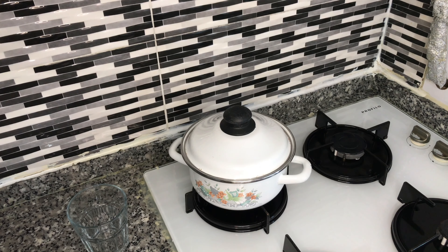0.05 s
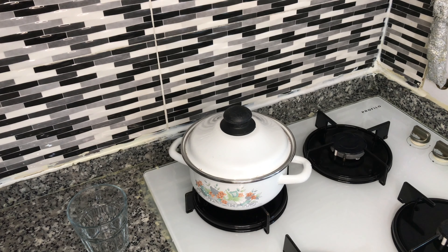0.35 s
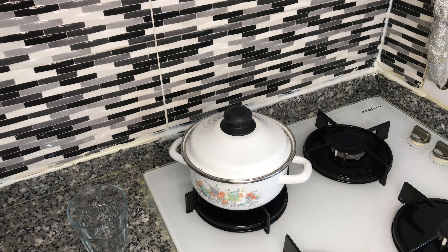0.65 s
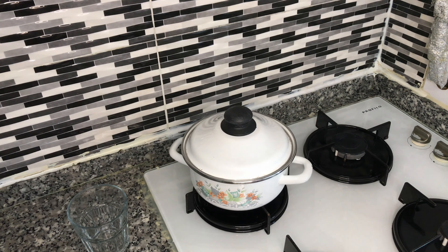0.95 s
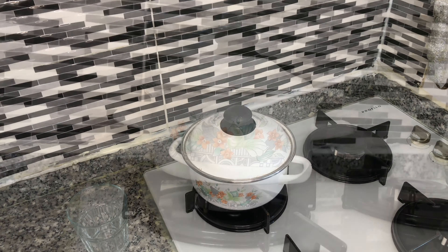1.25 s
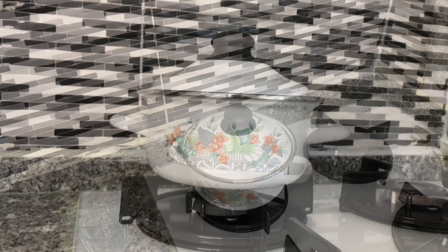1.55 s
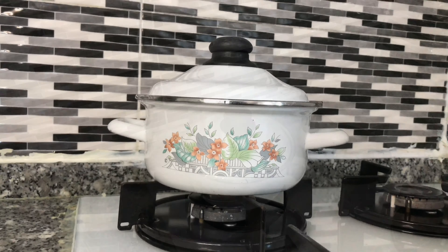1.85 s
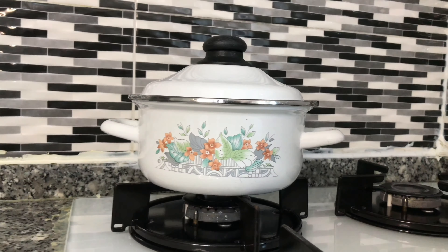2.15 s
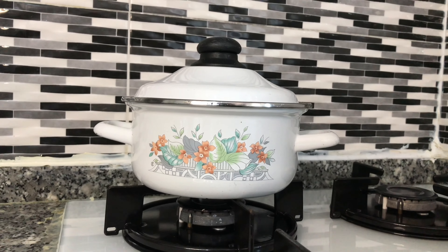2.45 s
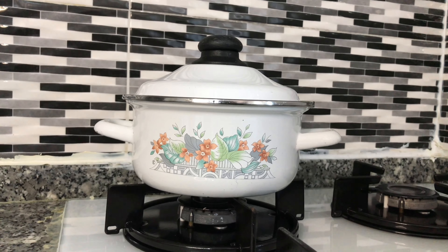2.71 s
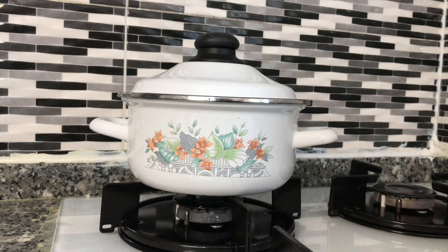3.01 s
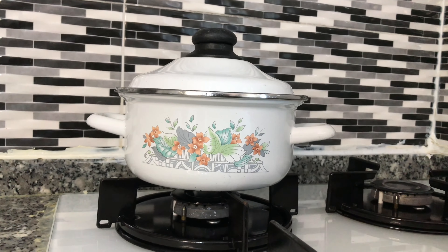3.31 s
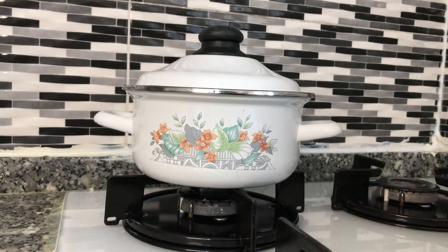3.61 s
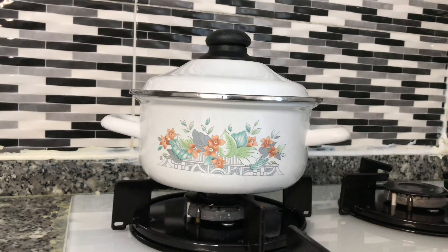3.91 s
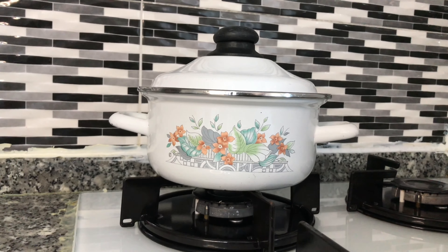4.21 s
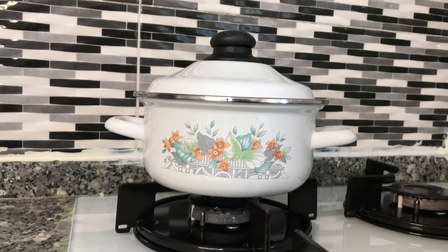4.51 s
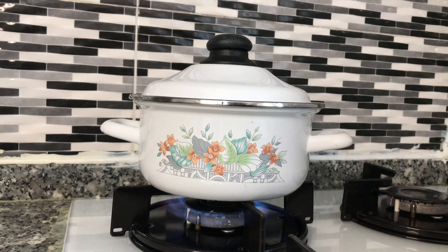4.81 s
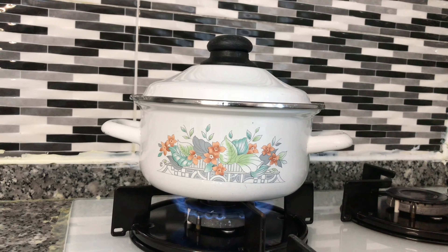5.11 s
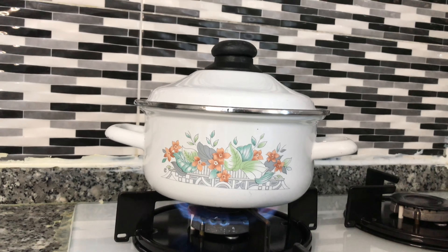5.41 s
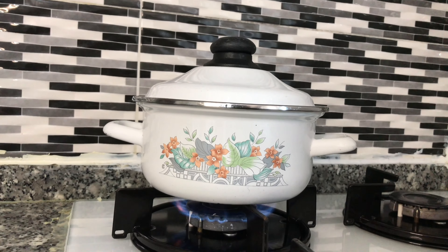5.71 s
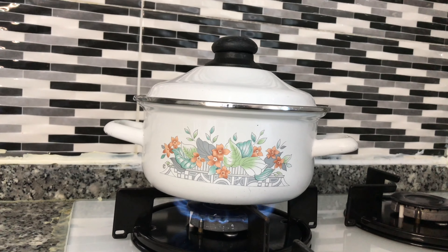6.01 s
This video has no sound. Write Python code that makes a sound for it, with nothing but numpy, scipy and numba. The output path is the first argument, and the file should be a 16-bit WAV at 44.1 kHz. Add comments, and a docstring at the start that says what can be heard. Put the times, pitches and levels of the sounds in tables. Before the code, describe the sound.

Quiet room air and a low rumble fill a small tiled kitchen, with a faint sleeve rustle and a few light handling taps in the first second and a half. At about 1.7 seconds a hard object is set down with one clattering knock that rings briefly. After a quiet pause, a stove knob clicks faintly at 4 seconds and gas begins a soft, steady hiss with an airy whistle in it. From 4.4 seconds the igniter snaps six times, about three a second, sharp, close and much louder than the rest, each snap with a short echo. The second spark, at 4.7 seconds, lights the burner with a low, fluttering puff, and the hiss lifts slightly in pitch. The last snap comes at 6 seconds, and the burner keeps hissing to the end at about 6.4 seconds.

```python
"""Small tiled kitchen: a gas burner is lit under an enamel pot.
Over room air and faint handling, a hard object is set down with one ringing knock.
The knob clicks, the valve opens, and the gas jet hisses and sounds the burner's mixing tube.
The igniter snaps six times, echoing off pot and hob. The second spark lights the gas with a soft,
fluttering puff; heat raises the tube's pitches."""
import sys
import numpy as np
from scipy import signal
from scipy.fft import rfft, irfft, next_fast_len
from scipy.io import wavfile
from numba import njit

SR = 44100
rng = np.random.default_rng(int(sys.argv[2]) if len(sys.argv) > 2 else 0)


def to_wav(sig):
    """Store sig (one row per channel, or 1-D mono) as 16-bit WAV at the path in sys.argv[1].

    Samples outside -1..1 are clipped; the rate is SR.
    """
    pcm = np.clip(np.atleast_2d(sig), -1, 1) * 32767
    pcm = np.round(pcm).astype(np.int16)
    wavfile.write(sys.argv[1], SR, pcm.T)  # frames by channels


N = 275791
BURST_SIZE = 32768
TIME = np.arange(N) / SR
AGE = TIME[:BURST_SIZE]   # s since a burst's onset
KNOB_S, LIGHT_S, FLARE_S = 3.977, 4.725, 0.24   # knob clicks, gas catches, length of the flare
CUTOFF_HZ = 16100


def from_db(db):
    """Decibels to gain."""
    return 10 ** (np.asarray(db) / 20)


def rms_one(x):
    """Scale to rms 1."""
    return x / np.sqrt(np.mean(x ** 2) + 1e-20)


def energy_one(x):
    """Scale to unit energy."""
    return x / np.sqrt(np.sum(x ** 2) + 1e-20)


def coloured(x, colour):
    """Minimum-phase filter; colour rows (f/Hz, level/dB) are joined on a log-frequency axis."""
    size = next_fast_len(2 * len(x)) // 2 * 2
    hz, db = np.array(colour).T
    bin_hz = np.maximum(np.fft.rfftfreq(size, 1 / SR), 1)
    bin_db = np.interp(np.log(bin_hz), np.log(hz), db)
    cepstrum = irfft(np.log(from_db(bin_db)))
    cepstrum[1:size // 2] *= 2
    cepstrum[size // 2 + 1:] = 0
    return irfft(rfft(x, size) * np.exp(rfft(cepstrum)))[:len(x)]


def noise(colour, size=N):
    """Coloured noise, rms 1."""
    return rms_one(coloured(rng.standard_normal(size), colour))


def fade(t60_s):
    """Exponential decay from 1."""
    return np.exp(-np.log(1000) * AGE / t60_s)


def approach(start_s, rise_s):
    """0 until the start, then an exponential approach to 1."""
    return 1 - np.exp(-np.maximum(TIME - start_s, 0) / rise_s)


def stroke(peak_s, rise_s, fall_s):
    """Exponential swell to 1 and decay."""
    return np.exp(-np.maximum((peak_s - TIME) / rise_s, (TIME - peak_s) / fall_s))


def drift(rate_hz):
    """Random wander between knots of spread 1."""
    knots = rng.standard_normal(2000)
    return np.interp(TIME * rate_hz, np.arange(len(knots)), knots)


def add(track, start_s, sound):
    """Mix a sound into a track."""
    at = round(start_s * SR)
    track[at:at + len(sound)] += sound[:len(track) - at]


@njit
def resonate(x, angle, radius):
    """Two-pole resonance with moving centre and width, peak gain 1."""
    y = np.zeros(len(x))
    for i in range(2, len(x)):
        r = radius[i]
        drive = (1 - r * r) / 2 * (x[i] - x[i - 2])
        y[i] = drive + 2 * r * np.cos(angle[i]) * y[i - 1] - r * r * y[i - 2]
    return y


def whistle(hz, width_hz):
    """Noise twice through one resonance: an airy pitch of constant power."""
    hz, width_hz = hz + np.zeros(N), width_hz + np.zeros(N)
    angle = 2 * np.pi * hz / SR
    radius = np.exp(-np.pi * width_hz / SR)
    once = resonate(rng.standard_normal(N), angle, radius)
    return resonate(once, angle, radius) * np.sqrt(width_hz[0] / width_hz)


def struck(modes, spread_db):
    """Decaying sines with scattered levels and random phases."""
    out = 0
    for hz, db, t60_s in modes:
        gain = from_db(db - spread_db * rng.standard_normal())
        out += gain * fade(t60_s) * np.sin(2 * np.pi * (hz * AGE + rng.random()))
    return out


def background(air_db=-64.5, room_db=-62.5, grip_db=-55, grip_decay_s=0.48, flame_db=-57,
               hum_db=-66, hum_hz=48.9):
    """Room air, faint mains hum and the low rumble of room, hand and flame."""
    rumble_colour = [(12, -29.5), (20, -19), (32, -5), (49, 1.5), (80, -7.5), (108, -12), (124, -20.5),
                     (160, -13.5), (210, -48), (350, -120)]   # rumble spectrum: f/Hz, level/dB
    air_colour = [(65, -25), (110, 0.5), (125, -8.5), (150, -7), (253, -5), (503, -14.5), (688, -11.5),
                  (981, -15), (1340, -15), (1460, -16.5), (1720, -17.5), (10500, -29.5), (13300, -29.5),
                  (16000, -33)]   # room air spectrum: f/Hz, level/dB
    grip = from_db(grip_db) * np.exp(-TIME / grip_decay_s)
    flame = from_db(flame_db) * approach(LIGHT_S, FLARE_S)
    rumble = np.sqrt(from_db(room_db) ** 2 + grip ** 2 + flame ** 2) * noise(rumble_colour)
    phase = 2 * np.pi * hum_hz * TIME
    hum = from_db(hum_db + drift(rate_hz=4.6)) * (np.sin(phase) + 0.5 * np.sin(2 * phase))
    return rumble + hum + from_db(air_db) * noise(air_colour)


def faint_whistle(hz=1770, width_hz=110, level_db=-77, end_s=2.07):
    """A faint thin whistle sounds at first and dies away."""
    fade_out = np.clip(2 * (end_s - TIME), 0, 1)
    return from_db(level_db) * rms_one(whistle(hz, width_hz)) * fade_out


def handling(sleeve_db=-58, push_db=-57):
    """A sleeve brushes past; later the hob's body rumbles as the hand pushes the knob home."""
    sleeve_colour = [(250, -6), (650, 1), (1800, -1), (3600, -0.5), (7500, -10), (14000, -15), (16000, -17)]   # cloth rustle: f/Hz, level/dB
    push_colour = [(60, -14), (150, 0), (300, 2.5), (600, -11), (1100, -10), (2500, -46)]   # hob body: f/Hz, level/dB
    sleeve = stroke(peak_s=0.47, rise_s=0.14, fall_s=0.1) * noise(sleeve_colour)
    push = stroke(peak_s=KNOB_S, rise_s=0.14, fall_s=0.07) * noise(push_colour)
    return from_db(sleeve_db) * sleeve + from_db(push_db) * push


def ticks(edge_ratio=1.44):
    """Faint taps, bumps and the gas knob's click: decaying bands of noise."""
    taps = [(0.701, -52, 212, 0.069), (.741, -47.5, 195, 0.071), (0.754, -44, 79.5, 0.083),
            (0.930, -57, 8500, .02), (1.131, -57.5, 2800, 0.023), (1.478, -48.5, 9500, 0.01),
            (1.64, -36, 74, 0.15)]   # handling taps: t/s, level/dB, f/Hz, t60/s
    knob_click = [(-58.5, 730, .24), (-53.5, 2240, 0.16), (-58, 8300, .05)]   # bands of the click: level/dB, f/Hz, t60/s
    out = np.zeros(N)
    for start_s, db, hz, t60_s in list(taps) + [(KNOB_S, *part) for part in knob_click]:
        edges_hz = np.clip([hz / edge_ratio, hz * edge_ratio], 20, CUTOFF_HZ)
        bandpass = signal.butter(2, edges_hz, "band", fs=SR, output="sos")
        band = signal.sosfilt(bandpass, rng.standard_normal(BURST_SIZE))
        add(out, start_s, from_db(db) * rms_one(band) * fade(t60_s))
    return out


def knock(clack_db=-23, clack_t60_s=0.081, ring_db=-33, tail_db=-36):
    """A hard object touches, lands and rocks; the hardest blow sets its modes ringing."""
    contacts = [(1.6458, -12, 1500), (1.6635, 2, 9000), (1.6707, 1, 2930), (1.6945, -4, 1100)]   # blows: t/s, level/dB, low-pass f/Hz
    modes = [(188, -9, .4), (282, -6, .28), (307, -7, .3), (404, -11, .27), (545, -11, .52), (655, -4, .48),
             (709, -7, .3), (780, -6, .26), (908, 1, .22), (977, -3, .2), (1045, -3, .2), (1100, -1, .22),
             (1339, 2, .29), (1370, -2, .29), (1561, -11, .4), (1686, -3, .39), (1848, -9, .33),
             (2132, -10, .33), (2350, -6, .26), (2783, -13, .23), (3192, -9, .13), (3700, -17, .19),
             (5523, -25, .54)]   # object's modes: f/Hz, level/dB, t60/s
    colour = [(24, -48), (40, -11), (133, -26), (290, -11.5), (412, -18), (646, -10), (1240, -13),
              (1370, -3.5), (1480, -12), (2320, -15), (2910, -18), (3740, -23), (7540, -36), (12500, -31),
              (16000, -31)]   # clack spectrum: f/Hz, level/dB
    out = np.zeros(N)
    for start_s, db, lowpass_hz in contacts:
        clack = from_db(clack_db) * noise(colour, BURST_SIZE) * fade(clack_t60_s)
        tail = from_db(tail_db) * kitchen_tail(colour, build_s=0.0019)
        softness = signal.butter(1, lowpass_hz, fs=SR)
        add(out, start_s, from_db(db) * signal.lfilter(*softness, clack + tail))
    landing_s = max(contacts, key=lambda row: row[1])[0]
    add(out, landing_s, from_db(ring_db) * struck(modes, spread_db=1.0))
    return out


def kitchen_tail(colour, build_s):
    """Diffuse sound builds up between the tiles and dies band by band."""
    decays = [(100, 0.76), (600, 0.47), (1700, 0.36), (4000, 0.3), (8000, 0.25), (15000, 0.23)]   # reverberation: f/Hz, t60/s
    spectrum = rfft(noise(colour, BURST_SIZE))
    bin_hz = np.fft.rfftfreq(BURST_SIZE, 1 / SR)
    centres_hz = [hz for hz, _ in decays]
    out = 0
    for weights, (_, t60_s) in zip(np.eye(len(decays)), decays):
        band = irfft(spectrum * np.interp(bin_hz, centres_hz, weights))
        out += band * fade(t60_s)
    return out * (1 - np.exp(-AGE / build_s))


def gas(open_s=4.015, level_db=-47, tube_db=-0.73, jet_db=-7.0, hot_width_share=0.73):
    """Jet turbulence sounds the mixing tube, whose pitches rise and sharpen with heat."""
    # mixing tube: cold f/Hz, width/Hz, level/dB, rise at full heat/Hz, gain at full heat/dB
    modes = [(1820, 220, 0, 50, -1), (2130, 320, -19, 250, 12), (4050, 600, -8.5, 560, 5.5),
             (6330, 350, -1, 190, -1), (8450, 450, -17, 300, 0), (9150, 900, -16, 300, 1),
             (10700, 400, -22, 350, 3), (12520, 300, -12, 300, -1), (14220, 280, -12, 330, 4),
             (14750, 400, -19, 300, 10)]
    jet_colour = [(200, -8), (550, -10.5), (1150, 5), (1600, 7.5), (2400, -1), (2900, -2.5), (3500, -4),
                  (5000, -5.5), (5800, 4.5), (6900, -7), (7700, -1), (10300, -16), (13500, -0.5),
                  (15600, -9.5)]   # broad hiss: f/Hz, level/dB
    heat = burner_heat()
    narrowing = hot_width_share ** np.clip(2 * heat, 0, 1)
    tube = 0
    for hz, width_hz, db, rise_hz, hot_db in modes:
        flutter_db = 1.5 * drift(rate_hz=70)
        tone = whistle(hz + rise_hz * heat, width_hz * narrowing)
        tube += tone * from_db(db + hot_db * heat + flutter_db)
    flow = approach(open_s, rise_s=0.096)
    tube = from_db(tube_db) * rms_one(tube) * flow
    jet = from_db(jet_db) * noise(jet_colour) * flow ** 1.5   # needs nearly full flow
    waver_db = 0.5 * drift(rate_hz=4)
    return (tube + jet) * from_db(level_db + waver_db)


def igniter(crack_db=5.0, scatter_db=9.0, scatter_t60_s=0.06, scatter_hz=1400, ring_db=-29, tail_db=-26):
    """Each spark is one sharp pulse; it takes the same paths round pot and hob, then fills the room."""
    sparks = [(4.4074, -2.5), (4.7255, -1.5), (5.0282, -1.5), (5.346, -1), (5.6651, -1.16), (5.968, -1)]   # discharges: t/s, level/dB
    pulse_colour = [(40, -15), (90, 4), (300, -4.5), (550, -13.5), (900, -18), (1250, -9), (2200, -13),
                    (2750, -15.5), (3100, -4.5), (4900, -5), (6300, -1.5), (12700, 2.5), (15500, 2),
                    (17000, -26.5)]   # spark spectrum: f/Hz, level/dB
    reflections = [(.00055, .4), (.00098, .45), (.0021, .27), (.0042, .42)]   # off pot base and hob: delay/s, gain
    gap_modes = [(3343, -5, .05), (4700, -7, .04), (6120, -3, .035), (6900, -5, .03), (8084, -2, .04),
                 (8325, -2, .04), (8945, -3, .04), (9520, 0, .04), (11507, 0, .035), (12036, -1, .035),
                 (12730, 2, .035), (13876, -1, .035)]   # burner-to-pot gap: f/Hz, level/dB, t60/s
    tail_colour = [(200, -19.5), (900, -19), (1800, -5), (2700, -7.5), (3200, -3), (5000, -5), (7500, 0.5),
                   (9500, 4), (12500, 4.5), (16000, -10.5)]   # reverberation: f/Hz, level/dB
    echoes = from_db(scatter_db) * energy_one(rng.standard_normal(BURST_SIZE) * fade(scatter_t60_s))
    for delay_s, gain in reflections:
        echoes[round(delay_s * SR)] += gain * from_db(crack_db)
    # only short waves bounce off the pot and its supports
    echoes = signal.lfilter(*signal.butter(2, scatter_hz, "high", fs=SR), echoes)
    impulse = signal.unit_impulse(BURST_SIZE)
    paths = from_db(crack_db) * impulse + echoes
    pulse = energy_one(coloured(impulse, pulse_colour))
    ring = from_db(ring_db) * struck(gap_modes, spread_db=1.5)
    snap = signal.fftconvolve(pulse, paths)[:BURST_SIZE] + ring
    out = np.zeros(N)
    for start_s, db in sparks:
        tail = from_db(tail_db) * kitchen_tail(tail_colour, build_s=0.0056)
        add(out, start_s, from_db(db) * (snap + tail))
    return out


def burner_heat(steady_heat=0.34, settle_s=0.16):
    """Heat climbs to 1 during the flare, then relaxes to that of the steady flame."""
    flare = np.sin(np.pi / 2 * np.clip((TIME - LIGHT_S) / FLARE_S, 0, 1))
    return flare - (1 - steady_heat) * approach(LIGHT_S + FLARE_S, settle_s)


def ignition(swell_s=0.011, flutter_t60_s=0.16):
    """Groups of ports catch one after another; each puff rocks the air under the pot."""
    puffs = [(4.727, -36, 102, -36), (4.766, -27, 100.5, -37), (4.801, -30, 106, -35.5),
             (4.822, -30, 94, -61), (4.828, -36.5, 231, -40), (4.847, -47, 348, -46)]   # flame round the ring: t/s, thump level/dB, thump f/Hz, flutter level/dB
    flutter_colour = [(30, -24), (80, -4), (250, 9), (520, 4), (750, 4), (1100, 6), (1600, -5), (3000, -5),
                      (8000, -21)]   # flame flutter: f/Hz, level/dB
    swell = AGE / swell_s * np.exp(1 - AGE / swell_s)
    out = np.zeros(N)
    for start_s, thump_db, thump_hz, flutter_db in puffs:
        thump = from_db(thump_db) * swell * np.sin(2 * np.pi * thump_hz * AGE)
        flutter = from_db(flutter_db) * noise(flutter_colour, BURST_SIZE) * fade(flutter_t60_s)
        add(out, start_s, thump + flutter)
    return out


def gain_control(x, threshold_db=-15, share=0.26, release_db_per_s=15, attack_s=0.039):
    """Loud peaks turn the gain down; it creeps back up."""
    level_db = 20 * np.log10(np.abs(x) + 1e-9)
    cut_db = share * np.maximum(level_db - threshold_db, 0)
    release_db = release_db_per_s * TIME
    held_db = np.maximum.accumulate(cut_db + release_db, axis=-1) - release_db
    pole = np.exp(-1 / (attack_s * SR))
    return x * from_db(-signal.lfilter([1 - pole], [1, -pole], held_db))


def scene():
    """All sources, mono."""
    events = igniter() + knock() + ticks() + gas() + ignition() + handling()
    return (events + faint_whistle() + background())[None]


def record(dry):
    """Gain ducks after each spark; steep low-pass; peaks clip at full scale."""
    lowpass = signal.ellip(10, 0.2, 80, CUTOFF_HZ, fs=SR, output="sos")
    return np.clip(signal.sosfilt(lowpass, gain_control(dry)), -1, 1)


dry = scene()
out = record(dry)
to_wav(out)
```